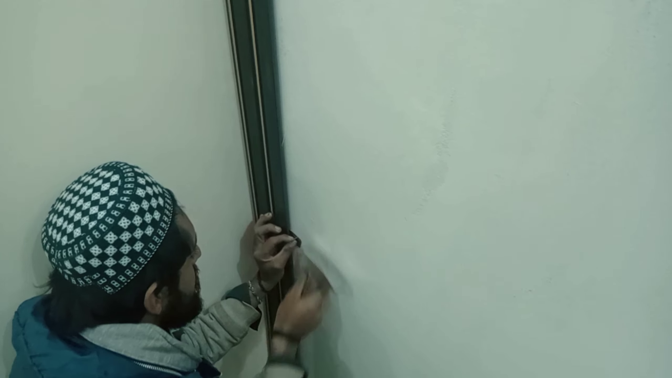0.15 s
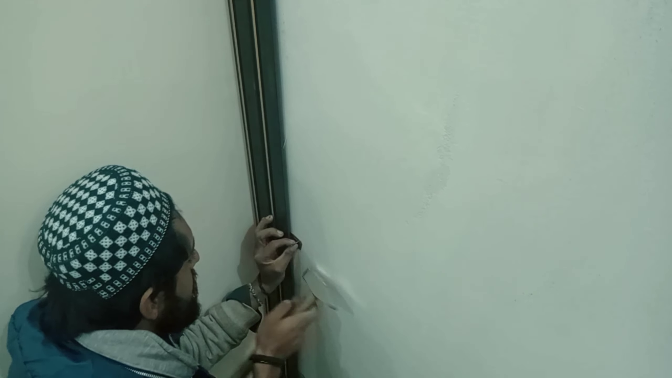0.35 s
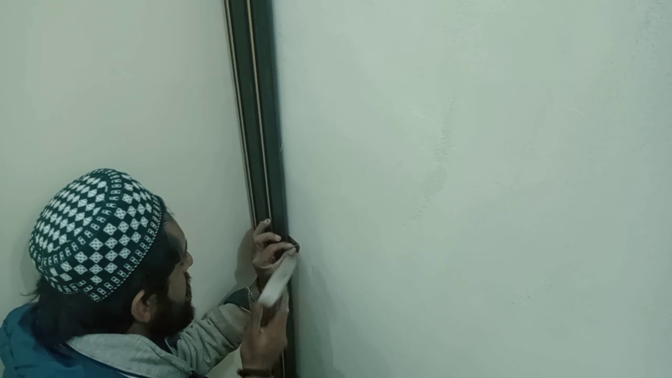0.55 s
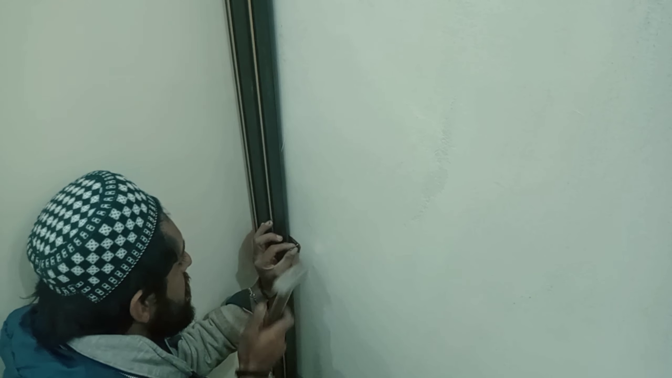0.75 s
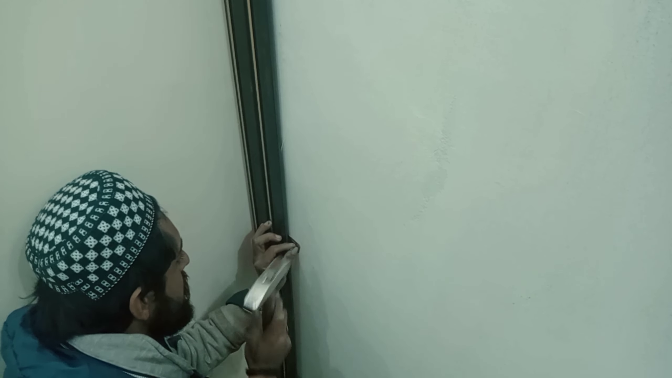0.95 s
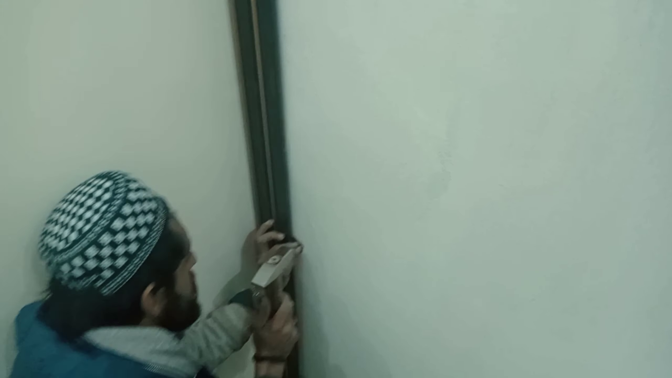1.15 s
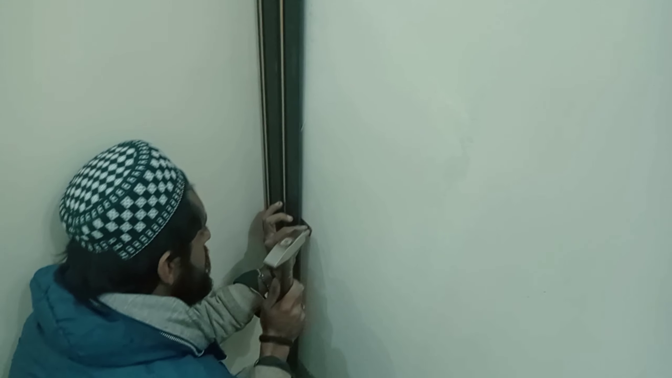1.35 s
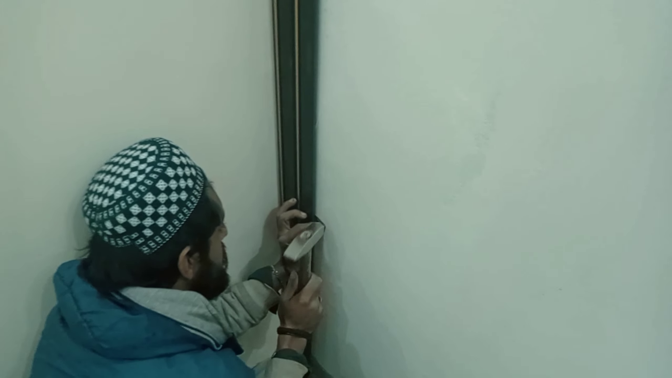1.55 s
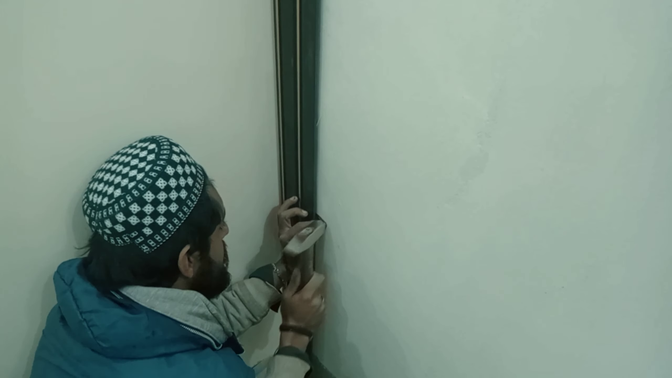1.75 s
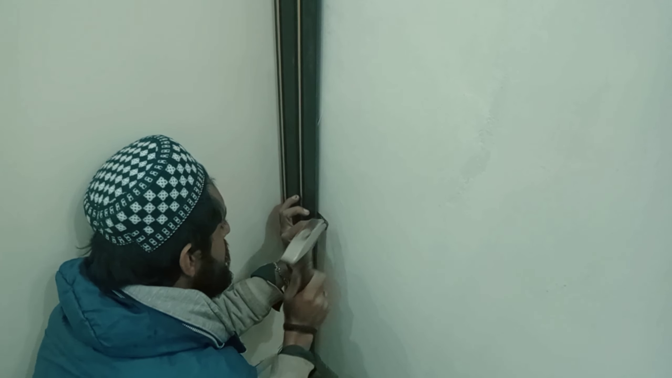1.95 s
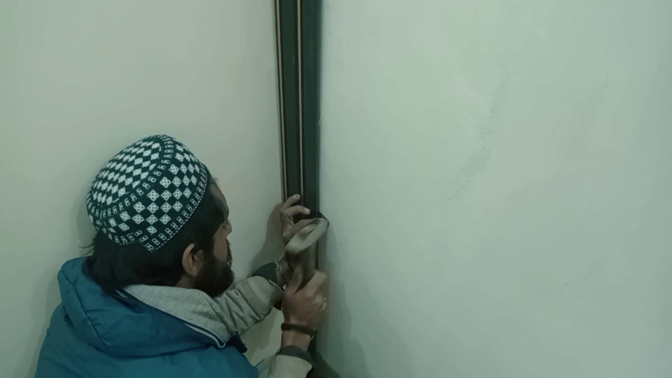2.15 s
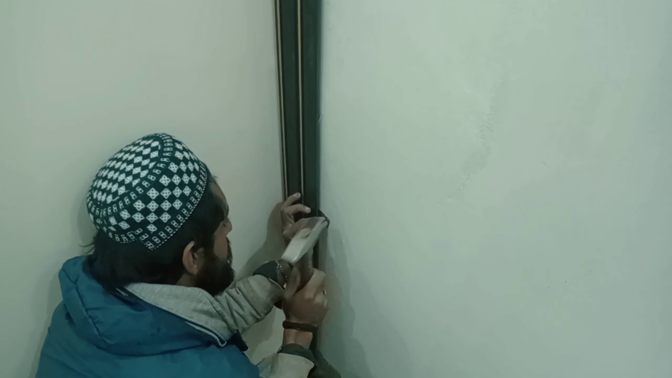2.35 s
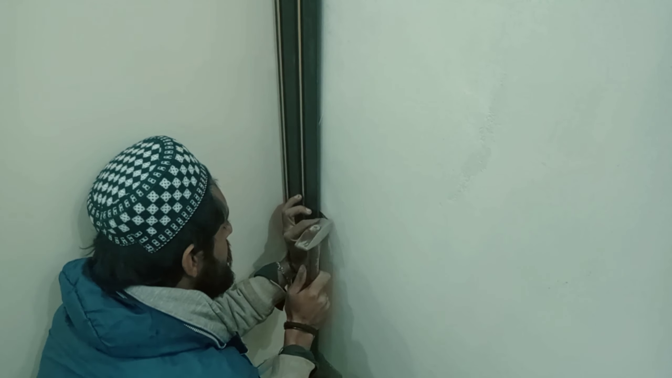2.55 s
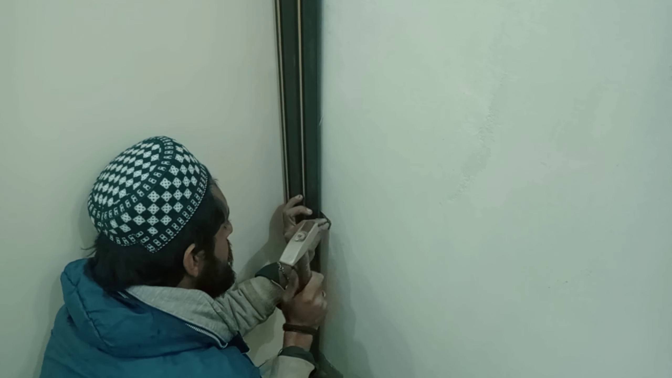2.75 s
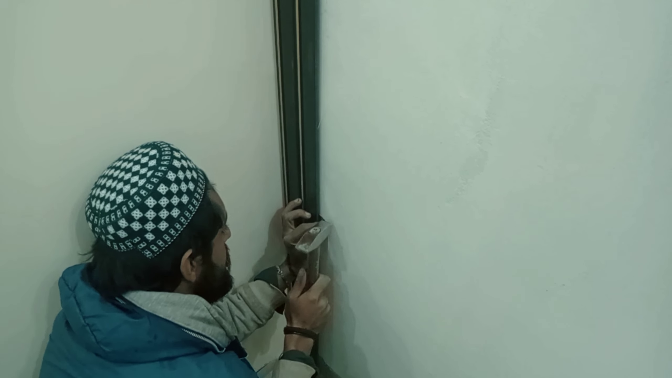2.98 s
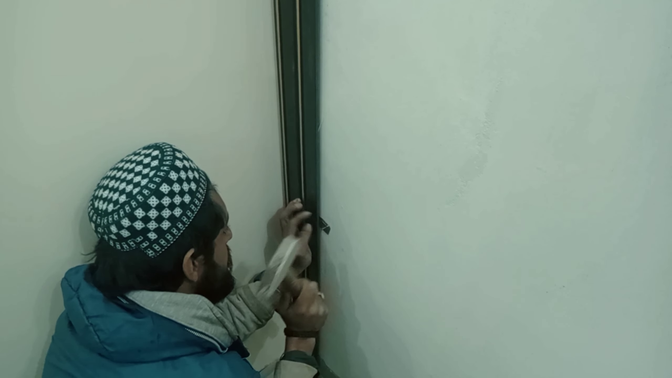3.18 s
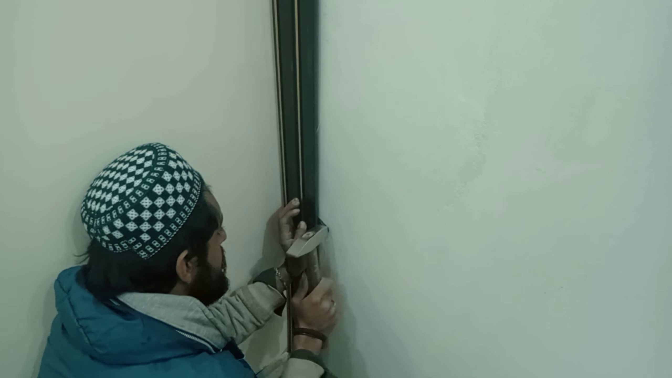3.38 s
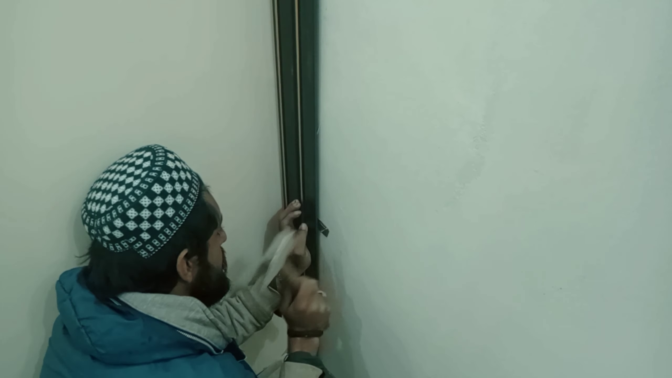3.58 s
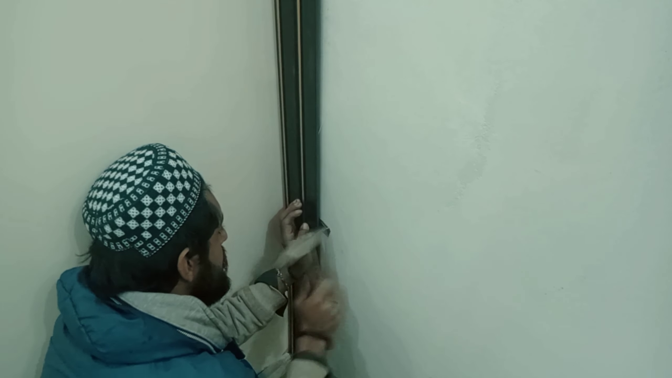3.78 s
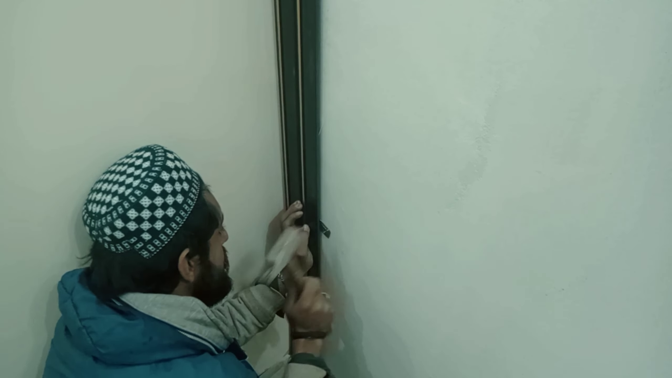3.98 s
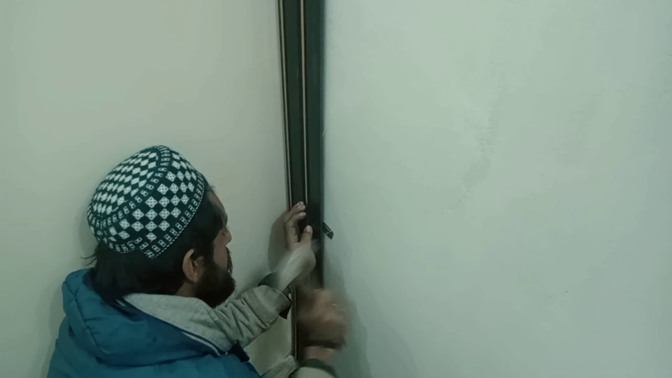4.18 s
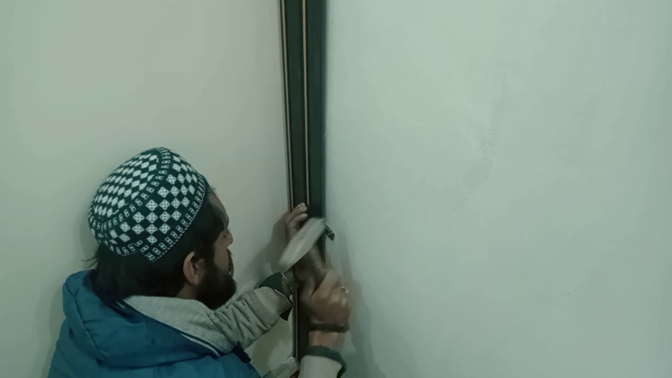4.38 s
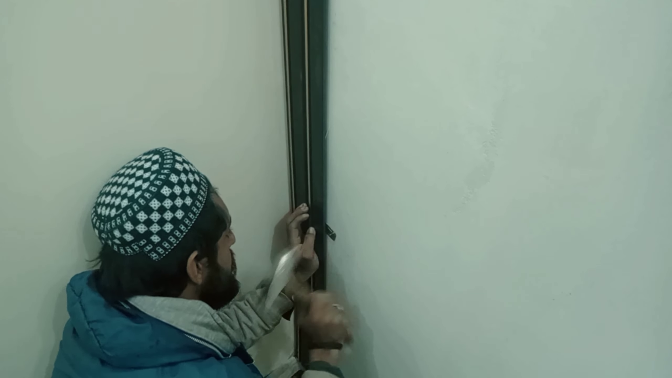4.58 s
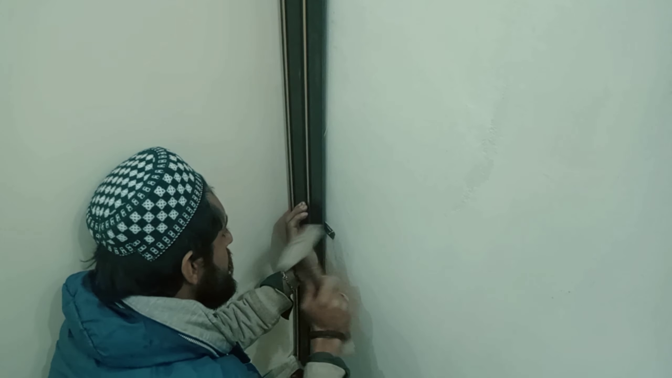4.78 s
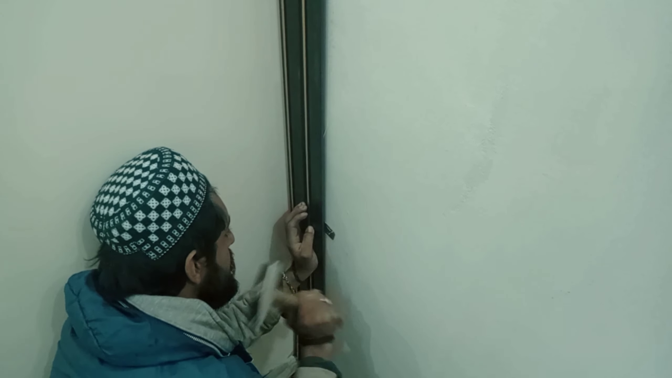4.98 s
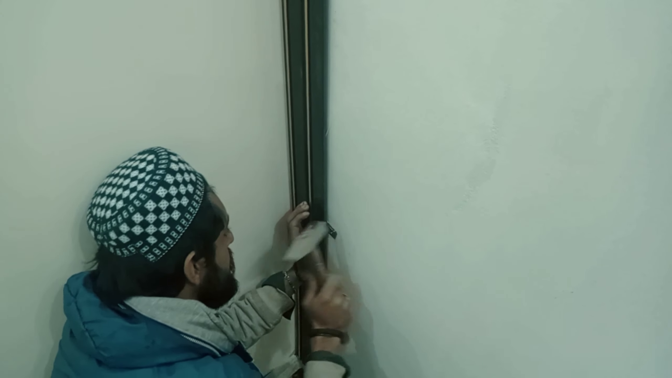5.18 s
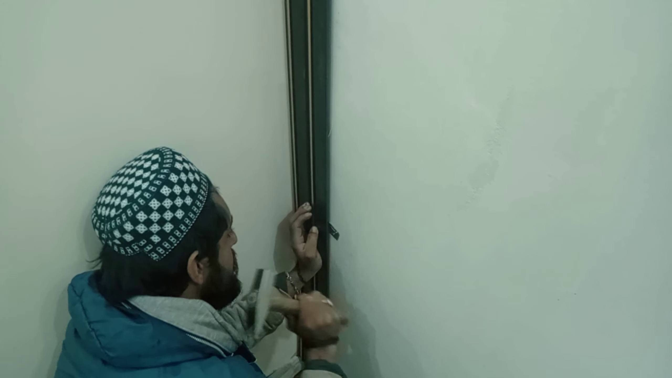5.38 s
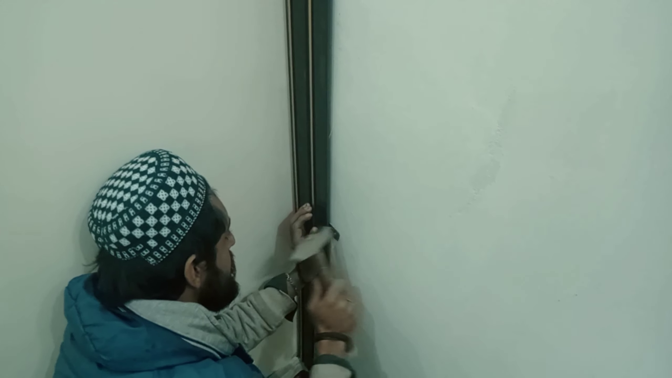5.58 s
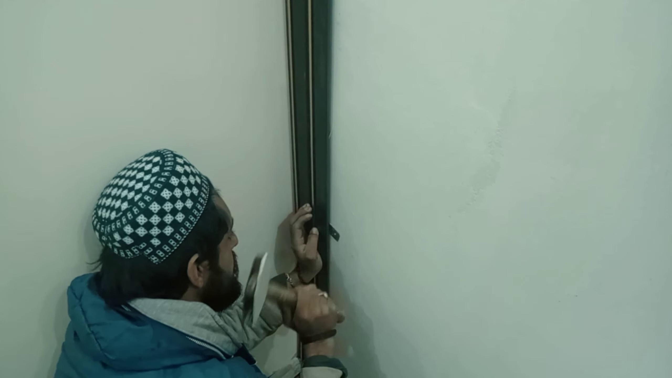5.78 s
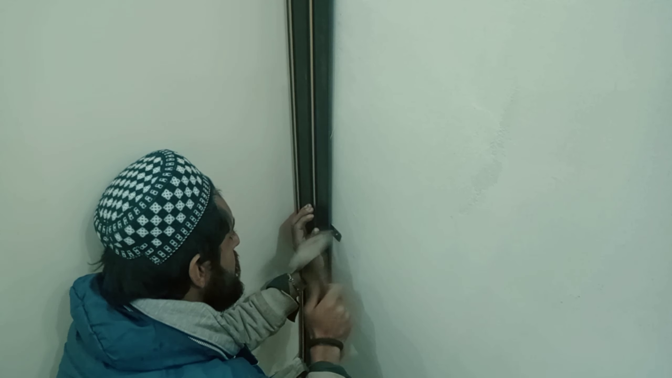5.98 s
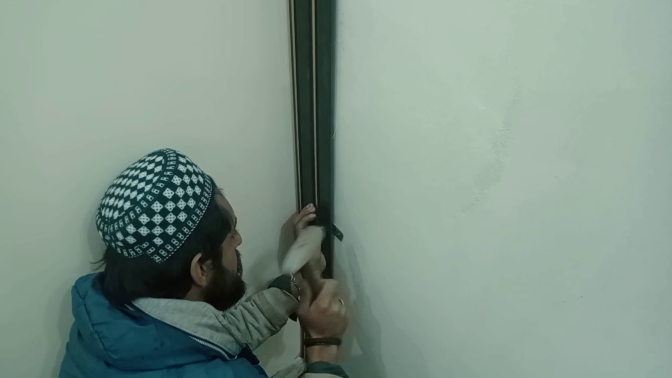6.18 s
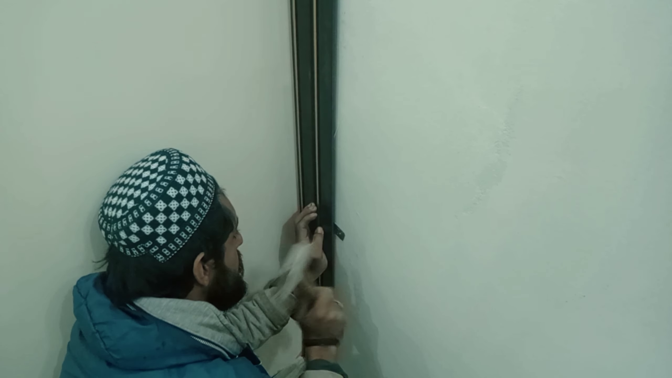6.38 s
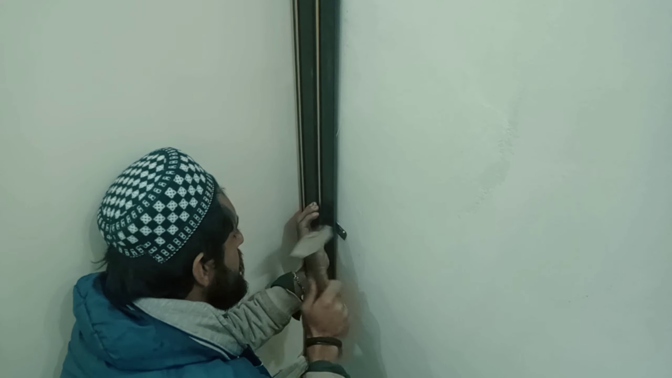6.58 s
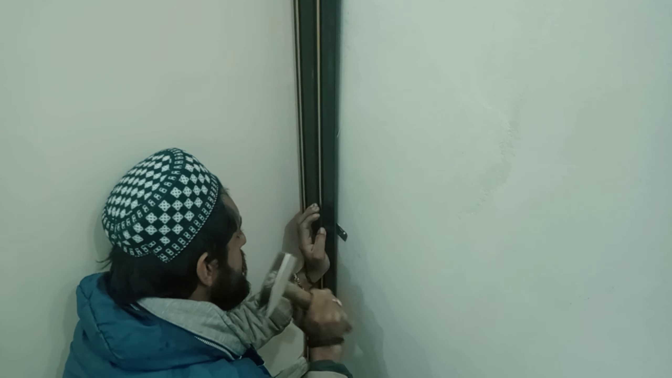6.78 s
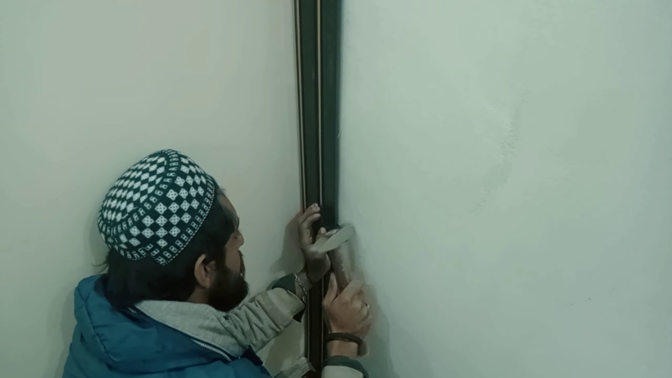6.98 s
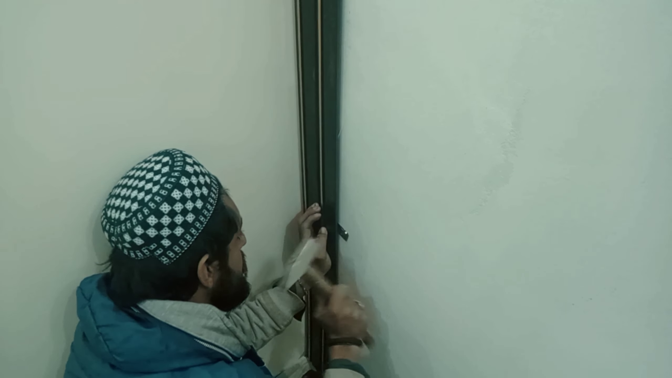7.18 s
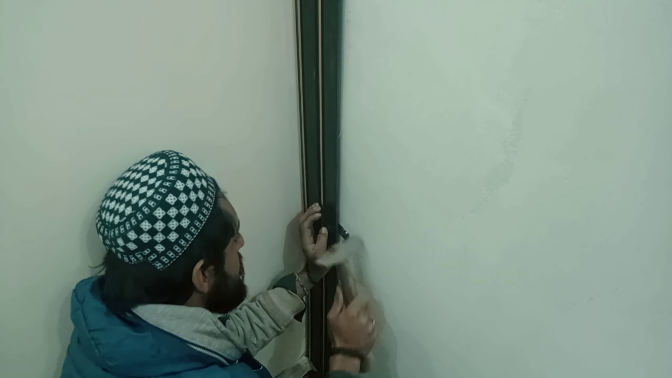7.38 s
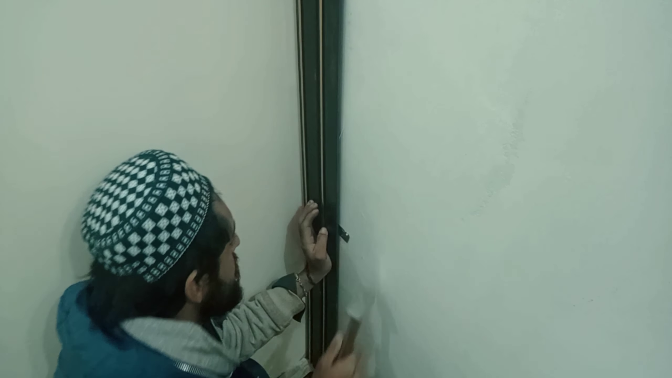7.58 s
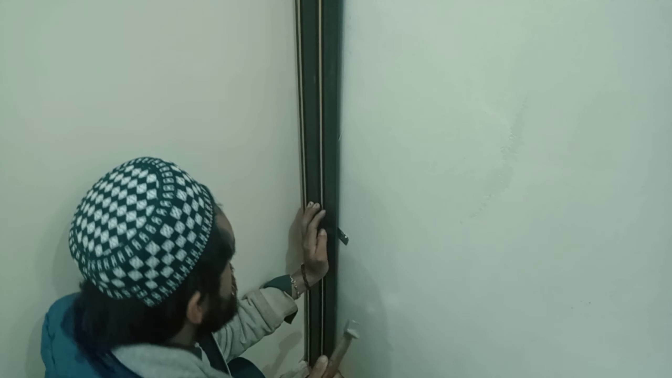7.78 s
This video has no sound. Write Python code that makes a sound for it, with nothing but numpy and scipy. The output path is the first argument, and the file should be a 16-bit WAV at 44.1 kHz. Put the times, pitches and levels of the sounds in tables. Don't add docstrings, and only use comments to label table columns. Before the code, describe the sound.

Steel hammer on nail, heard from about two metres by a phone in a bare reverberant room. Just over a second of soft hiss, tiny ticks and cloth movement leads into fifteen separate blows, thin and skidding at first, later loud, fuller and firmer as the nail seats. Panel thud and metal ring accompany each crack. After the last blow the echo fades and a sleeve rustles.

```python
import sys
import numpy as np
from scipy import signal
from scipy.fft import rfft, irfft
from scipy.io import wavfile
from scipy.ndimage import uniform_filter1d

SR = 44100
rng = np.random.default_rng(int(sys.argv[2]) if len(sys.argv) > 2 else 0)


def file_out(sig):
    cols = np.atleast_2d(sig).T
    lim = np.clip(cols, -1, 1)
    pcm = np.round(lim * 32767).astype(np.int16)
    wavfile.write(sys.argv[1], SR, pcm)


def gain_from_db(level_db):
    decades = np.asarray(level_db, float) / 20
    return 10 ** decades


N = 345655
BLOW_LEN, ROOM_LEN = 16384, 65536

# frequency in Hz, level in dB.
HISS_COLOUR = [(410, -41), (700, -16), (905, -13), (1200, -15), (1360, -13), (1610, -13), (1810, -10.5),
               (2220, -7), (2830, -9.5), (2940, -9.5), (5880, -34), (8000, -34.5), (15000, -43)]
# frequency in Hz, level in dB per Hz.
HUM_COLOUR = [(13, -60), (22, -29), (113, -6), (194, -17.5), (225, -9.5), (280, -14.5), (470, -18),
              (537, -17), (1200, -36.5), (1560, -58), (2640, -120)]
# frequency in Hz, level in dB.
CLOTH_COLOUR = [(600, -2), (1500, -1), (3200, 4.5), (4200, -2), (4500, -11), (4800, -13.5), (7000, -20),
                (9300, -11.5), (10000, -21), (11400, -23), (12500, -26), (15500, -43)]
# start in seconds, length in seconds, level in dB.
BRUSHES = [
    (-.05, .07, -58.5),
    (.22, .04, -63),
    (.3, 0.29, -63),
    (.65, 0.15, -61.5),
    (1.03, 0.05, -58.5),
    (1.19, .04, -58),
    (7.66, 0.082, -46.5),
    (7.75, 0.1, -58),
]
# start in seconds, length in seconds, level in dB.
BUMPS = [
    (.27, .25, -72),
    (.61, 0.066, -53.5),
    (.7, .1, -67),
    (1.17, 0.039, -71),
]
# start in seconds, length in seconds, level in dB.
RUBS = [
    (0.32, .2, -68),
    (.65, .08, -75),
]

# frequency in Hz, t60 in s, level against direct sound in dB, build-up in ms.
TAIL = [(59, 1.04, 7.5, 20), (117, 1.06, 15.5, 7.8), (260, 0.91, 7, 25), (497, 0.98, 5.5, 26),
        (980, 0.96, 0, 23), (2200, 0.64, 4, 4.8), (2850, 0.86, 6.5, 18), (3850, 0.59, -6.5, 9.1),
        (5660, 0.7, -4, 2.8), (8150, 0.55, 1.5, 4.2), (10700, 0.48, -3, 5.5), (15000, 0.31, 1, 2.7)]
# delay in ms, thud in dB, crack in dB.
ECHOES = [(0, 9, -4.5), (1.1, 2, 5), (2.858, 5.5, 6), (5.98, 6, 7), (9.44, 0, -25), (23.5, 6, 20),
          (25.3, -22, 4), (28.13, 7, 20), (34.14, -16, 18)]
# frequency in Hz, level in dB.
ECHO_COLOUR = [(100, -9), (500, -1), (2000, -6), (3800, 1.5), (6000, 2), (14000, 6)]
# frequency in Hz, t60 in seconds, level in dB.
ROOM_MODES = [(120.9, 1.35, -28), (130, 3, -43.5), (160.8, 2, -54), (200.4, 1.07, -36.5),
              (214.7, 0.86, -39), (252.4, 1.27, -41.5), (309.8, 0.62, -34), (383, 0.68, -60),
              (450.4, 0.43, -36.5), (484.6, 0.42, -39), (556, 0.98, -50), (647, 0.84, -53)]
STRAY_MS = [2.1, 4, 7.3]

# time in seconds, peak in dB, frequency in Hz.
TICKS = [
    (0.2202, -41, 2220),
    (0.3594, -42, 3060),
    (1.061, -41, 2550),
    (1.2095, -41, 3280),
    (4.143, -29, 3800),
]

BLOWS = [(1.3643, -13.5, 0.25, 0.3, 0.8), (1.7121, -9.5, 0.29, 0.27, 0.72), (2.0917, -8, 0.2, 0, 0.44),
         (2.4376, -4.5, 0.25, 0, 0.47), (2.792, -6, 0.52, 0.1, 0.08), (3.299, -1, 0.3, 0.27, 0.26),
         (3.7444, -2.5, 0.24, 0.44, 0.4), (4.1771, 5, 0.23, 0.62, 0.08), (4.6031, 4, 0.68, 0.61, 0.11),
         (5.0397, 4, 0.59, 0.6, 0), (5.457, 2.2, 0.42, 0.75, 0.49), (5.9606, -1.5, 0.92, 0.31, 0.22),
         (6.4025, -3, .72, 1, .99), (6.8415, 1.5, 0.87, 0.17, 0.07), (7.2038, 1.5, 0.98, 0.27, 0.17)]
# nail in Hz, nail width in Hz, nail in dB, head in Hz, head in dB.
RINGS = [(1995, 180, 10, 8400, 4.5), (2080, 110, 6, 8900, 13), (2670, 73, 1, 9000, 5.5),
         (2666, 61, 9, 7280, -12), (3350, 180, -2, 9345, -8), (2788, 43, 11.5, 9300, -3),
         (3690, 88, 8.5, 7900, 4), (3660, 210, 5, 10000, 4), (3670, 140, -7, 9300, 1),
         (2756, 79, 4, 9500, 5.5), (2760, 990, 3.5, 9400, 4.5), (3010, 170, 7, 6800, 5),
         (2560, 28, 13.5, 6700, 2.5), (2920, 710, 6, 8740, 8), (2620, 1800, 3, 8600, 3)]
# frequency in Hz, level in dB per Hz.
CRACK = [(24, -62), (40, -18.5), (114, -11), (151, -4), (209, 1), (242, 0.5), (410, -1), (1030, -2.5),
         (1110, -1), (1260, -8), (2740, 0), (3700, 5), (5810, -14.5), (9340, -15), (15800, -32.5)]
# frequency in Hz, level in dB.
PORT = [(3300, -1), (3800, 0), (4100, -2.5), (4600, -3.5), (5600, -0.5)]
# frequency in Hz, level in dB.
LOOSE = [(170, -1.05), (400, 5.9), (680, -4.5), (1050, -0.1), (1900, -5), (3200, 0.37), (4100, 2.5),
         (6500, -5)]
# frequency in Hz, level in dB.
SEATED = [(400, 0.1), (680, 14), (1050, 7.5), (1650, 5.5), (2400, -1.5), (3500, -2), (7500, 2.5),
          (13000, 2.6)]
# frequency in Hz, level in dB.
STEELY = [(170, -5), (400, -10), (680, -1), (1050, -11), (1800, -1), (3200, 0.63), (8500, 15.5), (13000, 2)]
# frequency in Hz, level in dB.
SKIDDING = [(170, 7.5), (400, -8.5), (680, -3.5), (1200, 1), (2400, -0.5), (4100, -3.5), (9000, -0.8),
            (13000, 11.5)]
# frequency in Hz, level in dB per second of driving.
DEEPER = [(400, 0), (900, 0.32), (1300, 1.28), (1900, 2), (2600, 0.82), (3800, 0.43), (6000, -0.46)]
NAIL_SET_S = [1.3, 3.25]
# time of its blow in seconds, frequency in Hz, level in dB.
PALM = [(2.79, 4030, -2), (3.3, 4000, 3), (4.6, 1120, -9), (3.74, 840, 7.5), (4.6, 2200, -4.5),
        (5.04, 1700, -1.5), (5.46, 1980, 2.5), (6.4, 1600, -5.5), (5.96, 1830, -9), (6.84, 4000, -6),
        (7.2, 1300, 1.5)]


def on_log(hz, points):
    at_hz, value = np.transpose(points)
    return np.interp(np.log(np.maximum(hz, 1)), np.log(at_hz), value)


def causal(gain_db):
    cep = irfft(gain_db * np.log(10) / 20)
    cep[1:len(cep) // 2] *= 2
    cep[len(cep) // 2 + 1:] = 0
    return np.exp(rfft(cep))


def ring(t, hz, t60_s):
    return np.sin(2 * np.pi * hz * t) * np.exp(-np.log(1000) * t / t60_s)


def noise(points):
    gain = gain_from_db(on_log(np.fft.rfftfreq(N + 1, 1 / SR), points))
    x = irfft(rfft(rng.standard_normal(N + 1)) * gain)[:N]
    return x / x.std()


def swells(rows):
    swell_s, fade_s = 0.025, 0.032
    t = np.arange(N) / SR
    gain = np.zeros(N)
    for start_s, length_s, db in rows:
        rise = np.clip((t - start_s) / swell_s, 0, 1)
        gain += gain_from_db(db) * rise * np.exp(-np.maximum(t - start_s - length_s, 0) / fade_s)
    return gain


def room_tone():
    hiss_db, hum_db = -59, -64.5
    return noise(HISS_COLOUR) * gain_from_db(hiss_db) + noise(HUM_COLOUR) * (gain_from_db(hum_db) + swells(BUMPS))


def rustle():
    rub_hz, rub_width_hz = 4560, 800
    grain = gain_from_db(0.92 * uniform_filter1d(rng.standard_normal(N), size=200) * np.sqrt(200))
    rub_colour = [(rub_hz - rub_width_hz, -30), (rub_hz, 0), (rub_hz + rub_width_hz, -30)]
    return grain * (noise(CLOTH_COLOUR) * swells(BRUSHES) + noise(rub_colour) * swells(RUBS))


def arrivals(hz):
    wall_loss_db = 2.94
    high = np.clip(np.log2(np.maximum(hz, 1) / 1100), 0, 1)
    clicks = 0
    for ms, thud_db, crack_db in ECHOES:
        db = thud_db + high * (crack_db - thud_db) - wall_loss_db * ms * hz / 10000
        delay_s = int(ms * SR / 1000) / SR
        clicks = clicks + gain_from_db(db) * np.exp(-2j * np.pi * hz * delay_s)
    return clicks * causal(on_log(hz, ECHO_COLOUR))


def diffuse_tail(t, hz):
    white, rows = rfft(rng.standard_normal(ROOM_LEN)), np.array(TAIL)
    out = np.zeros(ROOM_LEN)
    for centre_hz in 40 * 2 ** (np.arange(18) / 2):
        share = np.clip(1 - 2 * abs(np.log2(np.maximum(hz, 1) / centre_hz)), 0, 1)
        t60_s, db, rise_ms = (on_log(centre_hz, rows[:, [0, k]]) for k in range(1, 4))
        envelope = gain_from_db(db - 20 - 60 * t / t60_s) * (1 - np.exp(-t * 1000 / rise_ms))
        out += irfft(white * share) * envelope
    return out


def room(early):
    early_db, stray_db = 3.5, 7.5
    t, hz = np.arange(ROOM_LEN) / SR, np.fft.rfftfreq(ROOM_LEN, 1 / SR)
    out = diffuse_tail(t, hz)
    if early:
        out += sum(gain_from_db(db) * ring(t, mode_hz, t60_s) for mode_hz, t60_s, db in ROOM_MODES)
        first = irfft(arrivals(hz)) * gain_from_db(early_db)
        out[:ROOM_LEN // 2] += first[:ROOM_LEN // 2]
    else:
        out[(np.array(STRAY_MS) * SR / 1000).astype(int)] += gain_from_db(stray_db)
    return out


def ticks():
    t60_s, rise_s = 0.0046, 0.00075
    out, t = np.zeros(N), np.arange(1024) / SR
    for s, db, hz in TICKS:
        at = int(s * SR)
        modes = ring(t, hz, t60_s) + 0.25 * ring(t, 1.4 * hz, t60_s)
        out[at:at + len(t)] += gain_from_db(db + 4) * modes * np.tanh(t / rise_s)
    return out


def contact(rough):
    decay_s, lag_s, evenness = 0.0018, 0.00057, 0.93
    t, hz = np.arange(len(rough)) / SR, np.fft.rfftfreq(len(rough), 1 / SR)
    late = np.maximum(t - lag_s, 0) / decay_s
    burst = rfft(rough * late * np.exp(-late * 2))
    size = abs(burst) / np.mean(abs(burst)) + 0.0092
    chatter = np.clip(hz / 2500, 0, 1)
    phase = chatter * np.unwrap(np.angle(burst))
    x = irfft(size ** (chatter * (1 - evenness)) * np.exp(1j * phase))
    return x * np.exp(-(t / 0.008) ** 4)


def landing_db(hz, blow):
    palm_octaves = 0.26
    s, _, seated, steely, skid = blow
    db = on_log(hz, LOOSE) + seated * on_log(hz, SEATED)
    db += steely * on_log(hz, STEELY) + skid * on_log(hz, SKIDDING)
    driven_s = s - max(set_s for set_s in NAIL_SET_S if set_s < s)
    db += driven_s * on_log(hz, DEEPER)
    for palm_s, palm_hz, palm_db in PALM:
        if abs(palm_s - s) < 0.1:
            octaves = np.log2(np.maximum(hz, 1) / palm_hz)
            db += palm_db * np.exp(-(octaves / palm_octaves) ** 2)
    return db


def peak_db(hz, centre_hz, width_hz, db):
    return max(db, 0) / (1 + ((hz - centre_hz) / (width_hz / 2)) ** 2)


def steel_db(hz, rings, force_db):
    nail_hz, nail_width_hz, nail_db, head_hz, head_db = rings
    cheek_db = 1.8 + 0.6 * head_db - 0.35 * force_db
    nail = peak_db(hz, nail_hz, nail_width_hz, nail_db)
    head = peak_db(hz, head_hz, 600, head_db)
    return nail + head + peak_db(hz, 11580, 500, cheek_db)


def hammer():
    out, hz = np.zeros((2, N + BLOW_LEN)), np.fft.rfftfreq(BLOW_LEN, 1 / SR)
    rough, turns = rng.standard_normal((len(BLOWS), 2048)), rng.random(len(BLOWS))
    fade = np.hanning(2 * BLOW_LEN)[BLOW_LEN:]
    for k, blow in enumerate(BLOWS):
        s, force_db = blow[:2]
        colour_db = on_log(hz, CRACK) + on_log(hz, PORT)
        colour_db += landing_db(hz, blow) + steel_db(hz, RINGS[k], force_db)
        hit = -irfft(rfft(contact(rough[k]), BLOW_LEN) * causal(colour_db)) * fade
        at = int((s - 0.0005) * SR)
        shares = np.array([[1], [1.81 * turns[k] - 0.7]])
        out[:, at:at + BLOW_LEN] += hit * gain_from_db(force_db + 10) * shares
    return out[:, :N]


def scene():
    blows, stray = hammer()
    heard = signal.fftconvolve(blows + gain_from_db(-7) * ticks(), room(True))
    heard += signal.fftconvolve(stray, room(False))
    return (heard[:N] + room_tone() + rustle())[None]


def top_cut(x):
    return signal.sosfilt(signal.butter(12, 16830, fs=SR, output="sos"), x)


def record(dry):
    limit_db, dip_per_db, headroom, top_hz = -2.5, 1, 1.15, 15500
    t, gain_db = np.arange(N) / SR, np.zeros(N)
    for s, force_db, *_ in BLOWS:
        dip_db = dip_per_db * max(force_db - limit_db, 0)
        fall = np.clip((t - s + 0.026) / 0.012, 0, 1)
        recovery = np.exp(-np.maximum(t - s, 0) / 0.12)
        gain_db = np.minimum(gain_db, -dip_db * fall * recovery)
    rounded = headroom * np.tanh(dry * gain_from_db(gain_db) / headroom)
    top = signal.ellip(7, 0.3, 22, top_hz, fs=SR, output="sos")
    return top_cut(signal.sosfilt(top, rounded))


dry = scene()
out = record(dry)
file_out(out)
```